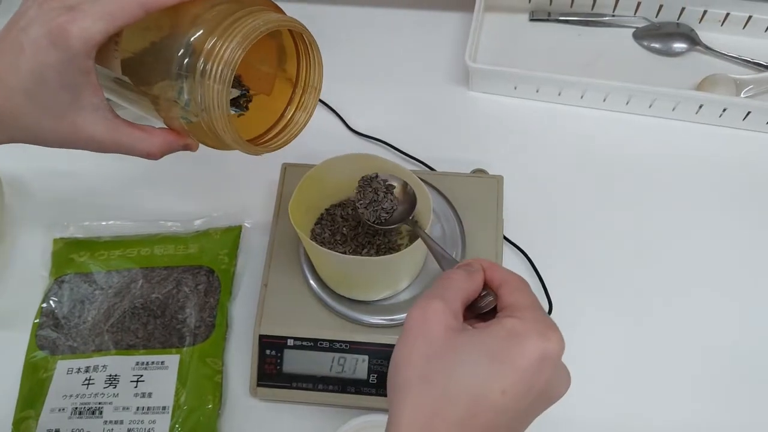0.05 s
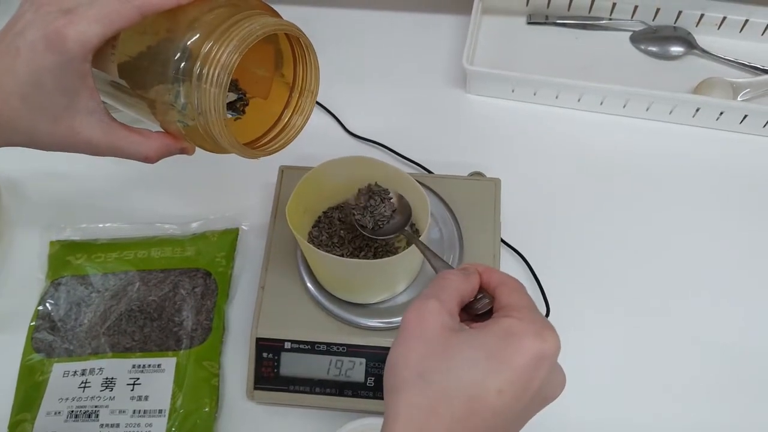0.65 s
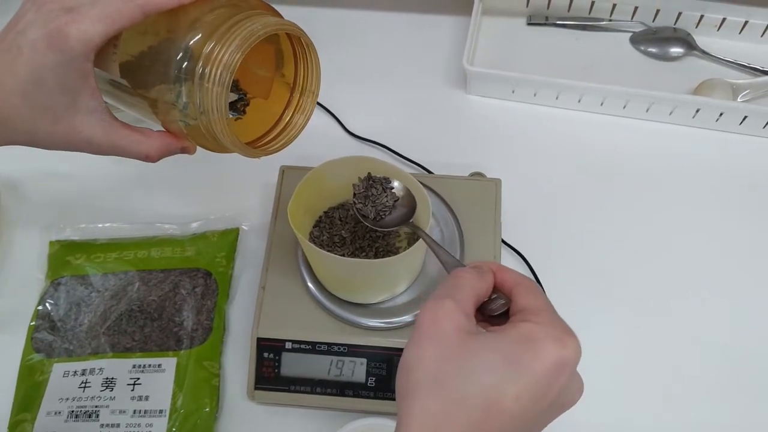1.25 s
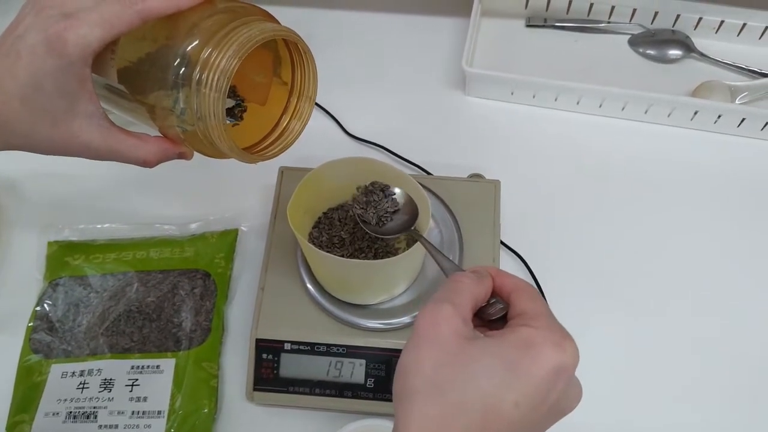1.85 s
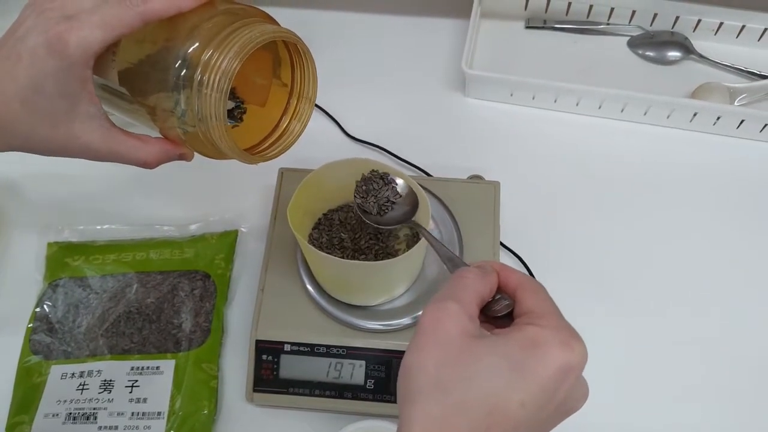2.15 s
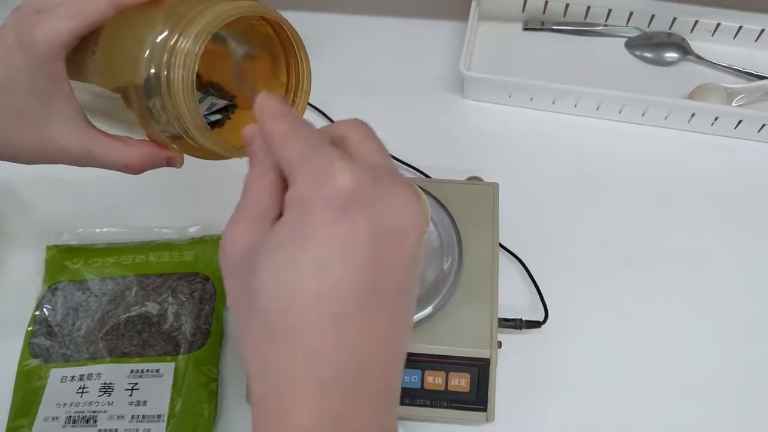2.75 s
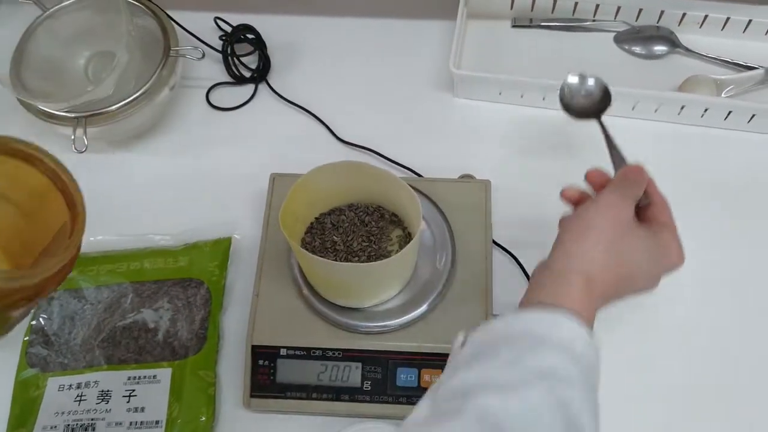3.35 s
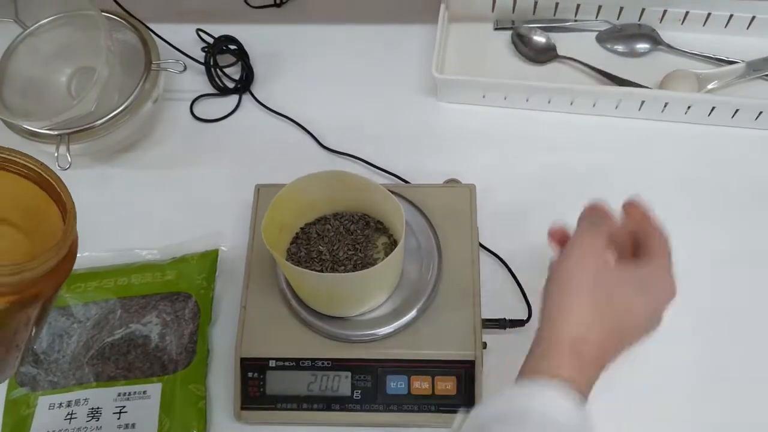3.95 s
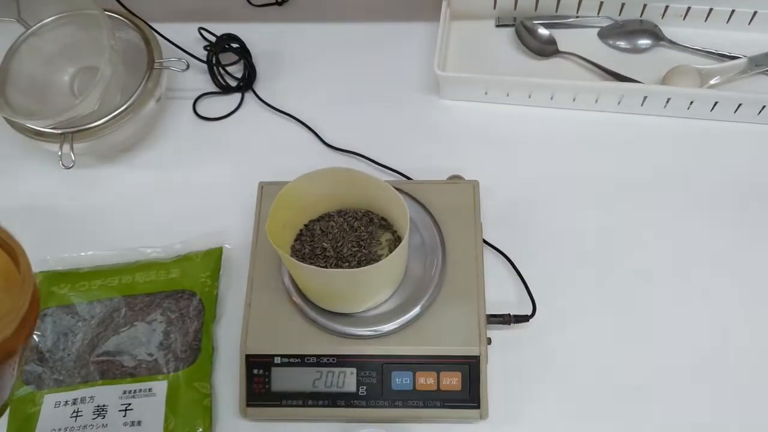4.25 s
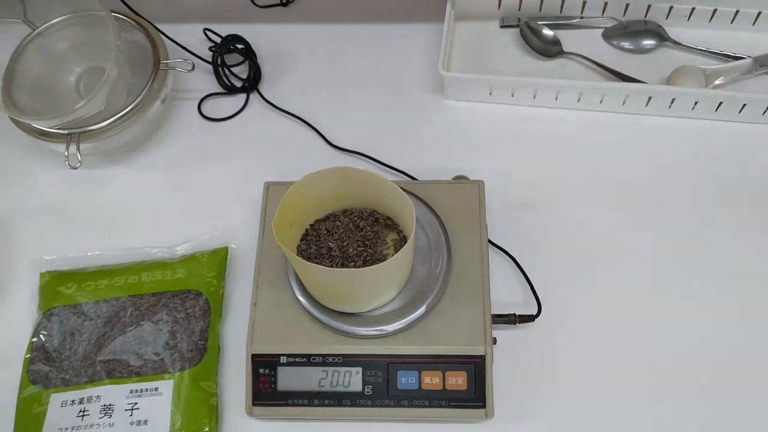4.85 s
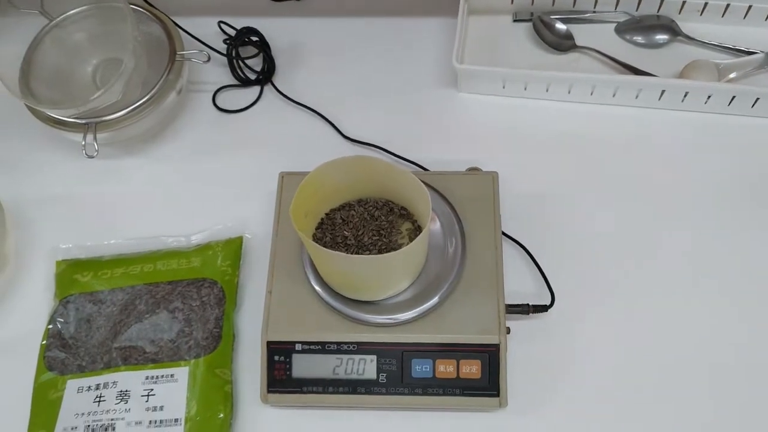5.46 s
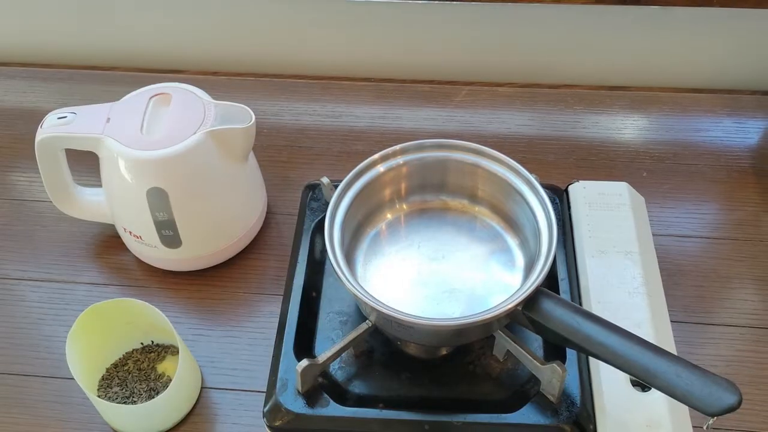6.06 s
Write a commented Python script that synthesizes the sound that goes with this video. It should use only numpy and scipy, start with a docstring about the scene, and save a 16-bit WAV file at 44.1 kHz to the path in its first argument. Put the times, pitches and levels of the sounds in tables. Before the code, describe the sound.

Dry seeds tick into a plastic cup, then a steel spoon taps a jar and clatters into a tray over low ventilation hum.

```python
"""Over ventilation and mains hum, dry seeds drop from a steel spoon and tick into a plastic cup. The rest
shower back into a plastic jar, and taps of the spoon excite the modes of the jar and its air. A sleeve rustles;
the spoon bounces and skids in a plastic tray, ringing against the cutlery. The jar is pushed aside with stick-
slip chatter, set down with a clack and handled with soft knocks. After a brief silence the scene changes to the
quiet air of a second room."""
import sys
import numpy as np
from scipy import signal
from scipy.fft import rfft, irfft, next_fast_len
from scipy.io import wavfile
from scipy.ndimage import map_coordinates

SR = 44100
rng = np.random.default_rng(int(sys.argv[2]) if len(sys.argv) > 2 else 0)


def put_to_file(sound):
    """Save the sound as 16-bit audio at rate SR, in the file named by the first command-line argument."""
    columns = np.atleast_2d(sound).T  # one column per channel
    safe = np.clip(columns, -1, 1)
    whole_steps = np.round(safe * 32767)
    wavfile.write(sys.argv[1], SR, whole_steps.astype(np.int16))


N = 272979
TIME = np.arange(N) / SR
AGE = np.arange(SR // 2) / SR  # time since an impact, in s
FIRST_ROOM_END_S, SECOND_ROOM_START_S = 5.615, 5.778


def amp(db):
    """Amplitude ratio of a level in decibels."""
    return 10 ** (np.asarray(db) / 20)


def unit(x):
    """Normalisation to rms 1."""
    return x / np.sqrt(np.mean(x ** 2) + 1e-20)


def along(points, hz):
    """Interpolation of (f/Hz, value) points on a logarithmic frequency axis."""
    f, values = np.transpose(points)
    return np.interp(np.log(hz + 1), np.log(f + 1), values)


def add(track, t, sound):
    """Superposition of a sound on the track from time t."""
    part = track[round(t * SR):][:len(sound)]
    part += sound[:len(part)]


def wobble(rate):
    """Smooth random modulation: a spline through rate knots a second."""
    return map_coordinates(rng.standard_normal(int(N * rate / SR) + 4), [TIME * rate])


def fade(t60):
    """Exponential decay by 60 dB in t60 seconds."""
    return amp(-60 * AGE / max(t60, 1e-3))


def swell(t, db, rise, fall, hold=0):
    """Exponential envelope: up 20 dB per rise seconds until t, held, down 20 dB per fall seconds."""
    before = np.maximum(t - TIME, 0) / max(rise, 1e-3)
    after = np.maximum(TIME - t - hold, 0) / max(fall, 1e-3)
    return amp(db - 20 * np.minimum(before + after, 10))


def excite(x, response):
    """Linear system: convolution with an impulse response scaled to unit energy."""
    return signal.fftconvolve(x, response / np.linalg.norm(response))[:len(x)]


def colour(x, spectrum):
    """Minimum-phase filter: folding the cepstrum gives a causal response with this spectrum."""
    size = 8192
    gain = amp(along(spectrum, np.fft.rfftfreq(size, 1 / SR)))
    cepstrum = irfft(np.log(np.maximum(gain, 1e-6)))
    fold = np.r_[1, np.full(size // 2 - 1, 2), np.zeros(size // 2)]
    return excite(x, irfft(np.exp(rfft(cepstrum * fold))))


def low_pass(x, hz, order):
    """Zero-phase low-pass filter of Butterworth magnitude."""
    size = next_fast_len(N + SR // 4)
    attenuation = np.sqrt(1 + (np.fft.rfftfreq(size, 1 / SR) / hz) ** (2 * order))
    return irfft(rfft(x, size) / attenuation, size)[:N]


def burst(spectrum, t60):
    """Modal overlap: the many short-lived modes of a struck body merge into decaying noise."""
    noise = colour(rng.standard_normal(len(AGE)) * fade(t60), spectrum)
    return noise * np.linalg.norm(fade(t60)) / np.linalg.norm(noise)


def ring(modes, scatter_db=2.5):
    """Free vibration: damped modes build up within a cycle, at new strengths for each blow."""
    out = np.zeros(len(AGE))
    for hz, db, t60 in modes:
        envelope = amp(db + scatter_db * rng.normal()) * fade(t60) * (1 - np.exp(-2 * hz * AGE))
        out += envelope * np.sin(2 * np.pi * (hz * AGE + rng.random()))
    return out


def grains(rate, spread_db):
    """Shot noise of rms 1: tiny impacts of random size, on average rate a second."""
    impulses = (rng.random(N) < rate / SR) * rng.choice([-1, 1], N)
    return unit(impulses * amp(spread_db * np.clip(rng.standard_normal(N), -2, 2)))


# reverberation time of the first room: f/Hz, t60/s
ROOM_DECAY = [(150, .32), (1500, .3), (8000, .25)]
def reverberate(x, wet_db):
    """Reverberation: a diffuse tail follows the direct sound, its treble decaying soonest."""
    hz, t, noise = signal.stft(rng.standard_normal(SR // 2), SR, nperseg=256)
    decay = amp(-60 * t / along(ROOM_DECAY, hz)[:, None])
    tail = signal.istft(noise * decay, SR, nperseg=256)[1][:len(AGE)]
    build_up = 1 - np.exp(-(AGE / 0.014) ** 2)
    return x + amp(wet_db) * excite(x, tail * build_up)


# ventilation spectrum and mains harmonics: f/Hz, relative level/dB
VENTILATION_SPECTRUM = [(12, -34.5), (20, -7), (91, -17.5), (126, -0.5), (150, -17.5), (199, -10),
                        (269, -1), (297, -10), (383, -5), (434, -9.5), (480, -8), (1650, -16), (2670, -27),
                        (7130, -34.5), (8300, -45), (10800, -74), (18300, -120)]
HUM_PARTIALS = [(121.5, -71), (243, -69)]
def first_room():
    """Background noise: broadband ventilation and mains hum, slightly unsteady in level and phase."""
    out = amp(-57 + 0.61 * wobble(16)) * unit(colour(rng.standard_normal(N), VENTILATION_SPECTRUM))
    for hz, db in HUM_PARTIALS:
        out += amp(db - 2 + 1.3 * wobble(3.7)) * np.sin(2 * np.pi * hz * TIME + 0.4 * wobble(12))
    return out


# spectrum of the second room's air: f/Hz, relative level/dB
SECOND_AIR_SPECTRUM = [(25, -26), (90, -18), (130, -12.5), (190, -4), (255, 2), (330, -6), (500, -5),
                       (900, -10.5), (1500, -19), (2300, -23), (3200, -32), (7500, -34.5), (10000, -39),
                       (14400, -37)]
def second_room():
    """Filtered noise: a dull rush of air whose level grows linearly in decibels."""
    start_db, db_per_s = -55, 14
    db = start_db + db_per_s * np.maximum(TIME - SECOND_ROOM_START_S, 0)
    return amp(db) * unit(colour(rng.standard_normal(N), SECOND_AIR_SPECTRUM))


# strokes of the arm: t/s, relative level/dB, rise/s, fall/s
ARM_STROKES = [(3.24, -51, 0.3, 0.4), (4.04, -52.5, .2, 0.3), (4.43, -49, 0.24, 0.12),
               (4.68, -55, 0.23, .3), (5.0, -48, 0.14, 0.047), (5.24, -49, 0.27, 0.17),
               (5.51, -41.5, .15, 0.15)]
# spectrum of brushing cloth: f/Hz, relative level/dB
CLOTH_SPECTRUM = [(240, -35), (400, -3), (764, -4.5), (960, -8), (1390, -4.5), (2490, -12), (3460, -8.5),
                  (5000, -5.5), (5890, -14.5), (7400, -7), (8300, -27), (10800, -57), (18300, -120)]
def sleeve():
    """Friction noise: cloth fibres brush with an amplitude proportional to the arm's speed."""
    speed = np.sqrt(sum(swell(*stroke) ** 2 for stroke in ARM_STROKES))
    return amp(1.5) * colour(grains(rate=9000, spread_db=5.5) * speed, CLOTH_SPECTRUM)


# knocks of the handled jar, levels relative: t/s, thump/dB, click/dB, tick f/Hz, tick/dB
JAR_BUMPS = [(4.954, -37, -42.5, 320, -27), (4.9894, -23.5, -29.5, 3400, -36.5),
             (5.038, -31.5, -31, 566, -52), (5.181, -41, -37, 1460, -34), (5.25, -37.5, -44, 3980, -32.5),
             (5.419, -37.5, -45, 324, -42), (5.471, -38, -41, 606, -35.5), (5.4935, -36, -31.5, 620, -27)]
# spectra of a knock's thump and click: f/Hz, relative level/dB
THUMP_SPECTRUM = [(40, -62), (70, -46), (105, -22), (170, -5), (225, -5), (300, 6), (390, -7), (450, -15),
                  (600, -12), (800, -14), (1300, -50)]
CLICK_SPECTRUM = [(260, -23.5), (450, -2), (994, -19.5), (1350, -14), (3250, -28), (5030, -27.5),
                  (5970, -38.5), (7530, -25.5), (8300, -65), (10800, -75), (18300, -120)]
# modes of the table top: f/Hz, relative level/dB, t60/s
TABLE_MODES = [(228, -12, .38), (272, 0, .06), (312, -1, .075), (345, -8, .06), (425, -14, .1),
               (515, -16, .1)]
def jar_bumps():
    """Soundboard radiation: knocks drive the table; the wall's tick depends on where it is touched."""
    out = np.zeros(N)
    for t, thump_db, click_db, tick_hz, tick_db in JAR_BUMPS:
        thump = amp(-11.5) * burst(THUMP_SPECTRUM, t60=0.11) + amp(3.5) * ring(TABLE_MODES)
        tick = burst([(tick_hz / 2, -35), (tick_hz, 0), (tick_hz * 2, -40)], t60=0.017)
        click = burst(CLICK_SPECTRUM, t60=0.049)
        add(out, t, amp(thump_db) * thump + amp(click_db) * click + amp(tick_db) * tick)
    out -= low_pass(out, hz=99, order=3)  # the table top radiates no deep bass
    return reverberate(out, wet_db=-8.5)


# push on the jar: t/s, relative level/dB, rise/s, fall/s, hold/s
JAR_PUSH = [(4.44, -43, .19, 0.029, 0.039)]
# spectrum of the rubbing base: f/Hz, relative level/dB
RUB_SPECTRUM = [(180, -24.5), (300, -24), (761, -1), (924, -3.5), (1500, -3.5), (1680, -17.5), (1850, 2.5),
                (2930, -19), (6830, -17.5), (8300, -40.5), (10800, -67), (18300, -120)]
def jar_shove():
    """Stick-slip friction: the base lets go at uneven moments, as strongly as it is pushed."""
    chatter_hz, pitch_spread = 1680, 0.14
    first_slip_s, slip_gap_s = 4.313, 0.0155
    push = sum(swell(*row) for row in JAR_PUSH)
    friction = grains(rate=500, spread_db=0) * push
    # friction drives a resonance of wandering pitch
    wandering_hz = chatter_hz * np.exp(pitch_spread * wobble(25))
    carrier = np.exp(2j * np.pi * np.cumsum(wandering_hz) / SR)
    chatter = (excite(friction / carrier, fade(t60=0.0026)) * carrier).imag
    out = amp(-2.5) * colour(friction, RUB_SPECTRUM) + chatter
    release = 1 - np.exp(-AGE / 0.002)
    for k, (late, size, pitch) in enumerate(rng.standard_normal(size=(11, 3))):
        t = first_slip_s + slip_gap_s * (k + 0.22 * late)
        slip_hz, slip_db = chatter_hz * np.exp(pitch_spread * pitch), 16.5 + 2 * size
        add(out, t, np.interp(t, TIME, push) * release * ring([(slip_hz, slip_db, 0.025)]))
    return reverberate(out, wet_db=-9)


# the jar's edge meets the table, levels relative: t/s, level/dB, t60/s, ring/dB
JAR_CLACKS = [(4.812, -15.5, 0.043, 0.5)]
# spectrum of that contact: f/Hz, relative level/dB
EDGE_SPECTRUM = [(71, -44), (120, -23.5), (394, -6.5), (470, -13), (541, -18), (858, -2), (1120, -8),
                 (1570, -1.5), (1910, -10.5), (2200, -3), (3540, -13), (4230, 0), (5820, -14.5),
                 (7200, -3.5), (8300, -30.5), (10800, -83), (18300, -120)]
# modes of the jar's base: f/Hz, relative level/dB, t60/s
BASE_MODES = [(235, -7, .07), (310, -6, .07), (395, -1.5, .21), (720, -9, .04), (1390, -5, .04),
              (1600, -4, .035), (2240, -5, .03), (4100, -5, .04), (4237, -2.5, .06), (6900, -4, .03)]
def jar_set_down():
    """Impulse excitation: a hard contact gives a broadband clack and a hollow ring of the base."""
    out = np.zeros(N)
    for t, db, t60, ring_db in JAR_CLACKS:
        add(out, t, amp(db - 1) * (burst(EDGE_SPECTRUM, t60) + amp(ring_db - 16) * ring(BASE_MODES)))
    return reverberate(out, wet_db=-9.5)


def steel_tones(modes, strikes, rise_s):
    """Lightly damped modes: tones waver as a piece of cutlery rocks, until a touch damps them."""
    out = np.zeros(N)
    for t, db, tilt_db, free_s, damping_s in strikes:
        onset = (1 - np.exp(-AGE / rise_s)) ** 2
        damping = np.exp(-np.maximum(AGE - free_s, 0) / damping_s)
        for hz, mode_db, t60 in modes:
            rocking = amp(2 * wobble(80)[:len(AGE)])
            phase = 2 * np.pi * hz * AGE + 0.35 * wobble(90)[:len(AGE)]
            strength = np.sqrt(2) * amp(db + mode_db + tilt_db * np.log2(hz / modes[0][0]))
            add(out, t, strength * onset * damping * rocking * fade(t60) * np.sin(phase))
    return out


# contacts of steel on steel: t/s, level/dB, t60/s
STEEL_CLINKS = [(3.7703, -19, 0.033), (3.841, -27.5, 0.066), (3.859, -36.5, .04), (3.957, -36, 0.071)]
# spectrum of a clink: f/Hz, relative level/dB
STEEL_SPECTRUM = [(1500, -52), (3000, 4.5), (4000, 10.5), (5500, -16), (7000, 9.5), (8300, -13)]
# modes of the spoon and of the piece it nudges: f/Hz, relative level/dB, t60/s
SPOON_MODES = [(3723, 0, 1.2), (6853, 0, .26)]
NEIGHBOUR_MODES = [(5780, -4, .7), (5928, 0, 1.2)]
# their ringing: t/s, level/dB, tilt/(dB per octave), free time/s, damping time/s
SPOON_RINGS = [(3.609, -44.5, 18, .046, 0.0067), (3.77, -22.5, -5.5, 0.0075, 0.02395),
               (3.84, -16, -32, .02, 0.0025), (3.866, -30, 1, 0.14, 0.015)]
NEIGHBOUR_RINGS = [(3.845, -32.5, 0.0089, 0.16, 0.038)]
def cutlery():
    """Impact and free vibration: steel clinks on steel, and the spoon and its neighbour ring on."""
    clinks = np.zeros(N)
    for t, db, t60 in STEEL_CLINKS:
        add(clinks, t, amp(db) * burst(STEEL_SPECTRUM, t60))
    tones = steel_tones(SPOON_MODES, SPOON_RINGS, rise_s=0.0029)
    tones += steel_tones(NEIGHBOUR_MODES, NEIGHBOUR_RINGS, rise_s=0.022)
    return reverberate(clinks, wet_db=-8.5) + reverberate(tones, wet_db=-16)


def rattle(landing, count):
    """Inelastic collisions: the spoon rocks from end to end, each contact weaker and duller."""
    first_gap_s, gap_ratio, loss_db, dulling_db = 0.0098, 1.32, 2.03, 3
    start, db, t60, thud_db = landing
    times = start + np.cumsum(first_gap_s * gap_ratio ** np.arange(count))
    return [(t, db - 7 - k * loss_db, t60, thud_db + k * dulling_db) for k, t in enumerate(times, 1)]


# the spoon lands in the tray: t/s, level/dB, t60/s, relative thud/dB
SPOON_LANDINGS = [(3.5177, -21, 0.045, -16.5), (3.5882, -10, 0.084, -18.5), (3.777, -21.5, 0.05, -21),
                  (3.814, -29.5, 0.16, -22.5), (3.857, -26, 0.052, -23), (3.895, -31.5, 0.067, -9),
                  (3.983, -35, .07, -10.5)]
# the spoon skids: t/s, level/dB, rise/s, fall/s, hold/s
SPOON_SKID = [(3.803, -31, 0.094, .26, 0.027)]
# the tray's weight jolts the table: t/s, level/dB
TABLE_JOLTS = [(3.771, -47)]
# spectra of the tray's shell, its thud and the jolt: f/Hz, relative level/dB
SHELL_SPECTRUM = [(350, -41), (600, -15), (862, -10.5), (1310, 3.5), (1490, -4), (1900, 4.5), (2450, -11.5),
                  (3640, -5.5), (5650, -15), (6450, -13.5), (6960, -12), (7770, -22), (8300, -41),
                  (10800, -71), (18300, -120)]
THUD_SPECTRUM = [(60, -38), (95, -9), (140, -4.5), (200, -7.5), (260, 4.5), (340, -6), (500, -2.5),
                 (750, -19.5), (2000, -70.5)]
JOLT_SPECTRUM = [(15, -4), (35, -4), (60, -6.5), (110, -9.5), (300, -64)]
# modes of the shell and of its thud: f/Hz, relative level/dB, t60/s
SHELL_MODES = [(873, -8.5, 0.066), (1363, 0.5, 0.063), (1287, 1.5, 0.036), (1553, 0, 0.096),
               (1830, -10.5, .05), (3153, -2.5, 0.037)]
THUD_MODES = [(152.5, -6, 0.31), (170, -7.5, 0.24), (233, -11, 0.067), (277.6, -3, .1), (368, -3.5, 0.079),
              (424, 2, 0.097), (504, 3.5, 0.046)]
def tray():
    """Structure-borne sound: the spoon's impacts and friction drive the tray, which thuds on the table."""
    out = np.zeros(N)
    hardest = max(SPOON_LANDINGS, key=lambda row: row[1])
    for t, db, t60, thud_db in SPOON_LANDINGS + rattle(hardest, count=4):
        thud = burst(THUD_SPECTRUM, t60=0.087) + amp(-5.5) * ring(THUD_MODES)
        clack = burst(SHELL_SPECTRUM, t60) + amp(-12.5) * ring(SHELL_MODES)
        add(out, t, amp(db) * (clack + amp(thud_db) * thud))
    for t, db in TABLE_JOLTS:
        add(out, t, amp(db) * burst(JOLT_SPECTRUM, t60=0.06))
    shell = ring(SHELL_MODES)
    sliding = sum(swell(*row) for row in SPOON_SKID) * (TIME < 4.022)  # until the spoon lies still
    friction = grains(rate=650, spread_db=4.5) * sliding
    scrape = colour(friction, SHELL_SPECTRUM) + amp(-16) * colour(friction, THUD_SPECTRUM)
    return reverberate(out + scrape + amp(-2.5) * excite(friction, shell), wet_db=-10.5)


# spoon on the jar's rim: t/s, level/dB, t60/s, then relative wall/dB, air/dB, neck/dB
RIM_TAPS = [(2.6529, -19.5, 0.07, 1, -4.5, -28), (2.8064, -13.5, 0.025, 1.5, -7.5, -16.5),
            (2.815, -17.5, 0.088, -6, -6.5, -9), (2.8822, -24, 0.052, -17.5, -8.5, -16),
            (2.8954, -21.5, 0.073, -13, -20.5, 1), (2.9249, -28, 0.022, -26, -8.5, -9)]
# spectrum of a tap: f/Hz, relative level/dB
RIM_SPECTRUM = [(40, -50), (95, -13.5), (150, -8), (300, -7), (410, -11), (660, -13.5), (950, -2),
                (1400, -5), (2300, -7.5), (3400, -2), (5100, -1), (5900, -9.5), (6900, -4), (8300, -22)]
# modes of the jar's wall, enclosed air and neck: f/Hz, relative level/dB, t60/s
WALL_MODES = [(1490, -13, .06), (3275, -2, .06), (3370, -5, .06), (3660, -5, .045), (3960, -2, .05),
              (4110, -1, .045), (4850, -5, .04), (5130, -1, .045), (6670, -6, .04)]
CAVITY_MODES = [(145, -22, .1), (235, -14, .1), (370, -7, .06), (402, -3, .1), (456, -4, .23),
                (490, -10, .14), (515, -15, .14)]
NECK_MODES = [(850, -11, .07), (1235, -3, .07), (1295, 0, .08)]
def jar_taps():
    """Shell and cavity resonance: the spoon cracks on the rim; wall, air and neck ring briefly."""
    cracks, body = np.zeros(N), np.zeros(N)
    for t, db, t60, wall_db, air_db, neck_db in RIM_TAPS:
        add(cracks, t, amp(db) * burst(RIM_SPECTRUM, t60))
        wall = amp(wall_db - 0.5) * ring(WALL_MODES)
        cavity = amp(air_db) * ring(CAVITY_MODES)
        neck = amp(neck_db) * ring(NECK_MODES)
        add(body, t, amp(db) * (wall + cavity + neck))
    return reverberate(cracks, wet_db=-13) + reverberate(body, wet_db=-19)


# a thin stream of seeds, then the bulk of the heap: t/s, relative level/dB, rise/s, fall/s, hold/s
SEED_SLIDES = [(2.493, -39.5, 0.0026, .17, .14), (2.529, -30.5, 0.036, 0.027, 0.012)]
# spectrum of seeds striking the jar: f/Hz, relative level/dB
SHOWER_SPECTRUM = [(590, -59.5), (1000, -30), (1220, -27.5), (1350, -11), (1840, -15.5), (2530, -9.5),
                   (3020, -23.5), (3220, -14), (4790, -2), (7600, -12), (8300, -30), (10800, -50.5),
                   (18300, -120)]
def seeds_in_jar():
    """Shot noise: a spoonful of seeds showers on the jar's wall in many independent impacts."""
    flow = sum(swell(*row) for row in SEED_SLIDES) * (TIME > 2.488)  # once the spoon tips
    impacts = grains(rate=1900, spread_db=1) * flow
    return reverberate(amp(-2) * colour(impacts, SHOWER_SPECTRUM), wet_db=-9.5)


# seeds creep over the tilted spoon: t/s, level/dB, hold/s
SEED_CREEPS = [(0.557, -72, .035), (1.854, -71.5, 0.032), (2.253, -70, .005), (2.32, -76, 0.12)]
# clumps land in the cup: t/s, level/dB
SEED_DROPS = [(0.62, -33.5), (0.633, -29.5), (0.649, -28), (0.678, -27.5), (0.719, -28), (0.727, -28.5),
              (0.747, -31), (0.76, -32.5), (0.826, -31.5), (0.836, -35), (0.855, -25), (0.864, -25.5),
              (0.908, -33.5), (0.937, -28), (1.94, -28.5), (1.954, -27), (1.981, -35.5), (2.015, -32),
              (2.026, -34.5), (2.043, -29), (2.079, -31.5)]
# spectra of seeds on the spoon and in the cup: f/Hz, relative level/dB
SPOON_SPECTRUM = [(4000, -20), (6400, -2.5), (6850, 0), (7400, -5), (8300, -22)]
CUP_SPECTRUM = [(380, -47), (650, -36.5), (804, -4.5), (985, -3.5), (1160, -10), (1450, -6.5), (1810, -11),
                (2540, -9.5), (2860, -15), (5080, -4), (7070, -8.5), (7790, -14), (8300, -32),
                (10800, -47.5), (18300, -120)]
# modes of the cup: f/Hz, relative level/dB, t60/s
CUP_MODES = [(852, -19, 0.14), (1014, 10, 0.061), (5250, 6, 0.094), (5040, -6, 0.11), (6440, -1, 0.065)]
def seeds_in_cup():
    """Granular impacts: seeds hiss over the spoon, land in clumps, then bounce singly and settle."""
    clumps = np.zeros(N)
    onset = 1 - np.exp(-AGE / 0.0031)  # the seeds of a clump land a moment apart
    for t, db in SEED_DROPS:
        tick = burst(CUP_SPECTRUM, t60=0.02) + amp(-27.5) * ring(CUP_MODES)
        add(clumps, t, amp(db) * onset * tick)
    # the bounces of different clumps are incoherent, so their powers add
    power = sum(swell(t + 0.009, db - 19, rise=0.009, fall=0.092) ** 2 for t, db in SEED_DROPS)
    settling = colour(grains(rate=5000, spread_db=2) * np.sqrt(power), CUP_SPECTRUM)
    tilting = sum(swell(t, db, rise=0.055, fall=0.076, hold=hold) for t, db, hold in SEED_CREEPS)
    creep = colour(grains(rate=5000, spread_db=6) * tilting, SPOON_SPECTRUM)
    return reverberate(clumps + amp(-5) * settling + creep, wet_db=-14)


def scene():
    """Superposition: the work at the table in the first room; after a brief silence the scene changes to the
    second room."""
    work = seeds_in_cup() + seeds_in_jar() + jar_taps() + tray() + cutlery()
    work += jar_shove() + jar_set_down() + jar_bumps() + sleeve()
    fade_out = np.clip((FIRST_ROOM_END_S - TIME) / 0.0016, 0, 1)
    fade_in = np.clip((TIME - SECOND_ROOM_START_S) / 0.033, 0, 1)
    first = low_pass(work + first_room(), hz=8250, order=60)
    return (first * fade_out + second_room() * fade_in)[None]


def record(dry):
    """Band limiting: a steep low-pass removes the highest treble."""
    return low_pass(dry[0], hz=14400, order=120)[None]


dry = scene()
out = record(dry)
put_to_file(out)
```